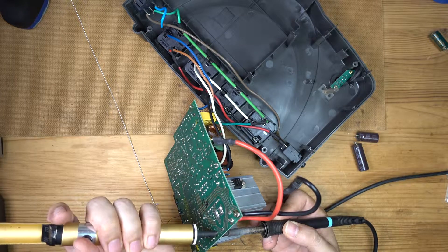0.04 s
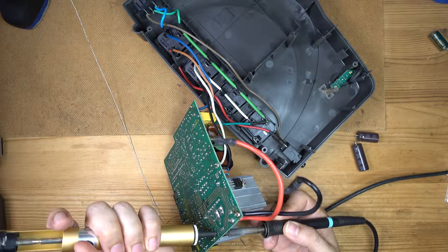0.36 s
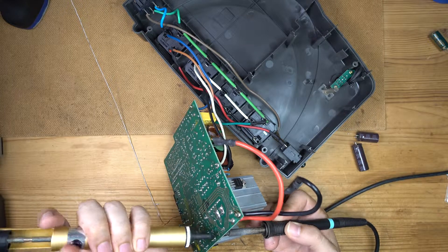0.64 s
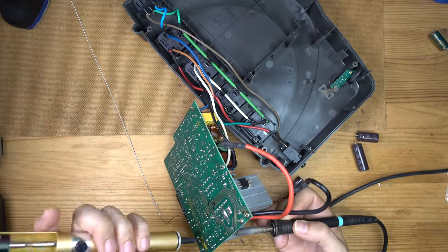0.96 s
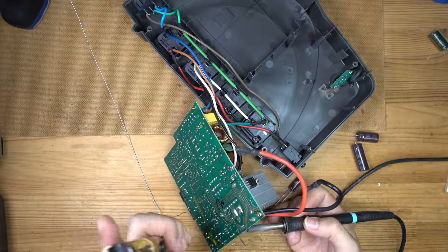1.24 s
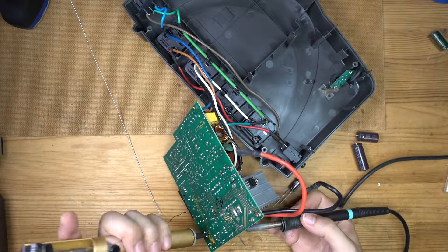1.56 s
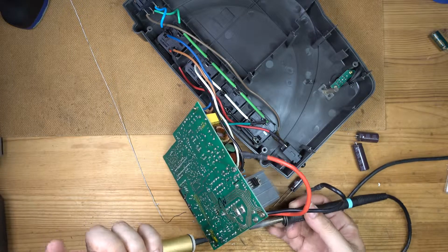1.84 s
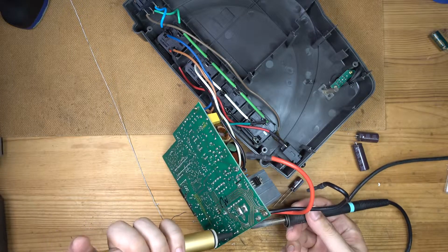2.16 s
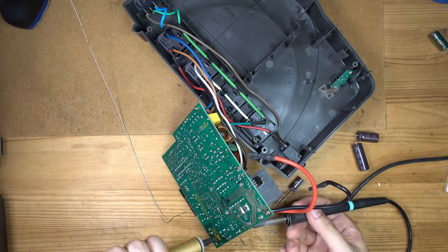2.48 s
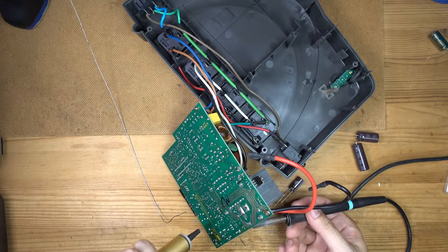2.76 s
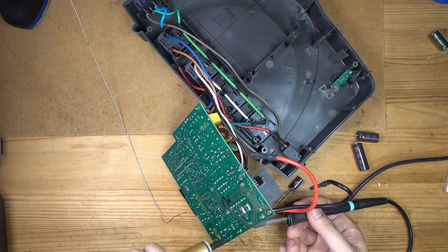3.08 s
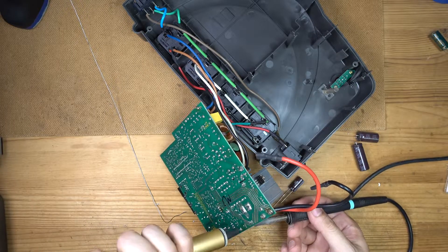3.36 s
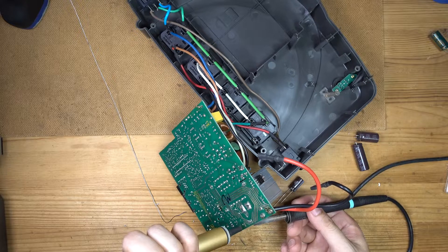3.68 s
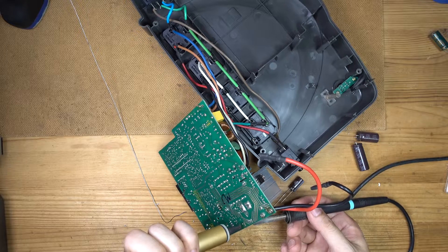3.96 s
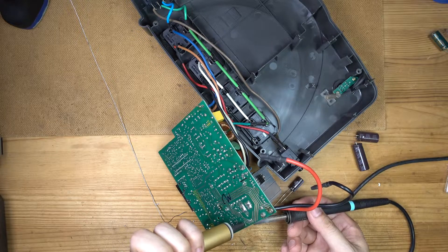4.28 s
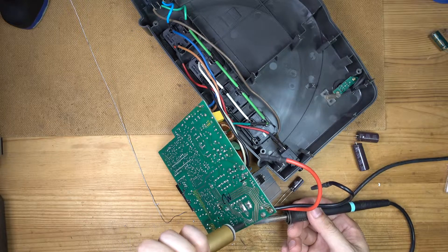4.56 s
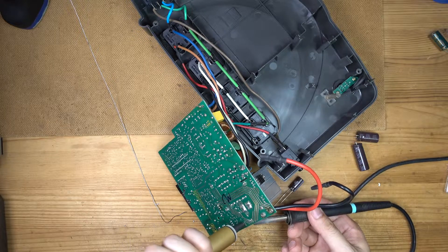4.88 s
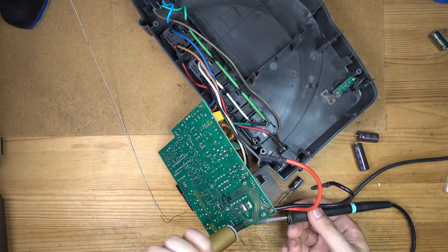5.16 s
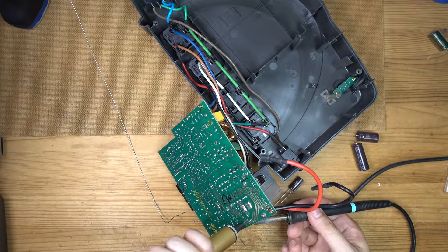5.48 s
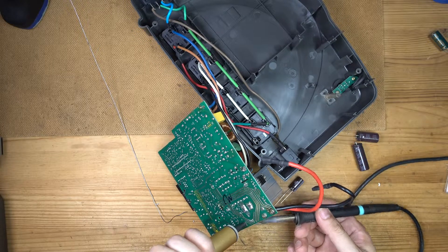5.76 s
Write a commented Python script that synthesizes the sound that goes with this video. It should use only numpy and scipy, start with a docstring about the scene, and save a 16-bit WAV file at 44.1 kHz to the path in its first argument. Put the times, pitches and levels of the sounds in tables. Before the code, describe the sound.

A spring-loaded desoldering pump is handled close to a stereo microphone in a small room with a steady low rumble and faint hiss. At about 0.4 seconds it fires with a short rush of air, ending in a knock and a soft boom from the wooden table. Sharp steel clicks follow around 0.7 seconds. From 1.3 to 2 seconds pump and circuit board knock lightly, with a bright click at 1.5 and brief rubs of the plunger being pushed down. Two ringing clicks come at 2.7 and 2.9 seconds, and the plunger slides again. At 3.1 seconds the spring snaps, by far the loudest sound, leaving a short, high metallic ring in the barrel. Dull knocks and soft table thumps follow between 3.2 and 3.4 seconds. After that there are only faint plastic rubs around 4 seconds and a few tiny taps until about 5.5.

```python
"""A spring-loaded desoldering pump at a circuit board, close to a camera's stereo microphone.
It fires with a short rush of air, is pushed down until it latches, and later snaps loudly,
leaving its barrel ringing. Steel parts click; pump and board knock on a wooden table that booms.
The place is a small room with a low steady rumble. The camera's limiter ducks under the snap."""
import sys
import numpy as np
from scipy import signal
from scipy.fft import rfft, irfft, next_fast_len
from scipy.io import wavfile
from scipy.ndimage import uniform_filter1d, minimum_filter1d, map_coordinates

SR = 44100
rng = np.random.default_rng(int(sys.argv[2]) if len(sys.argv) > 2 else 0)


def waveform_to_disk(signal):
    """Save audio, clipped to [-1, 1], as 16-bit WAV at the path in sys.argv[1]."""
    frames = np.transpose(np.atleast_2d(signal))
    scaled = np.clip(frames, -1, 1) * 32767
    samples = np.round(scaled).astype(np.int16)
    wavfile.write(sys.argv[1], SR, samples)


N = 257103


def amp(db):
    """Decibels to gain."""
    return 10 ** (np.asarray(db) / 20)


def unit(x):
    """Scale to rms 1."""
    return x / np.sqrt(np.mean(x ** 2) + 1e-20)


def along(points, hz):
    """Read (Hz, value) points on a log frequency axis."""
    freqs, values = np.transpose(points)
    return np.interp(np.log(hz + 1), np.log(freqs + 1), values)


def clock(size):
    """Sample times in seconds."""
    return np.arange(size) / SR


def add(track, s, sound):
    """Mix a sound into a track at s seconds."""
    part = track[:, round(s * SR):][:, :sound.shape[-1]]
    part += sound[..., :part.shape[1]]


def peak(hz, centre_hz, width):
    """Shape of one resonance, 1 at its centre; width is relative."""
    return 1 / (1 + ((hz / centre_hz - 1) / width) ** 2)


def gate(start, end, edge_db_per_s):
    """Level in dB: 0 from start to end, falling away steadily on both sides."""
    t = clock(N)
    return -edge_db_per_s * np.abs(t - np.clip(t, start, end))


def coloured(x, gain_db):
    """Minimum-phase filter; gain_db is a function of frequency."""
    size = 2 * next_fast_len(x.shape[-1] // 2 + 1024, True)
    cepstrum = irfft(np.log(amp(gain_db(np.fft.rfftfreq(size, 1 / SR))) + 1e-6))
    cepstrum[1:size // 2] *= 2
    cepstrum[size // 2 + 1:] = 0
    return irfft(rfft(x, size) * np.exp(rfft(cepstrum)))[..., :x.shape[-1]]


# Close sound and room sound at the microphone. Each row: frequency in Hz, left-right coherence.
CLOSE_FIELD = [(300, 1), (700, 1), (1500, 0.61), (4000, 0.38), (12000, .03)]
ROOM_FIELD = [(130, 1), (290, 0.96), (640, 0.84), (1410, 0.35), (3100, 0.1), (7000, -0.1)]
def noise(size, field):
    """White stereo noise, as alike in left and right as the field says."""
    fast = next_fast_len(size, True)
    coherence = along(field, np.fft.rfftfreq(fast, 1 / SR))
    angle = np.arccos(np.clip(coherence, -1, 1)) / 2
    spectra = rfft(rng.standard_normal((2, fast)))
    mid, side = irfft(spectra * [np.cos(angle), np.sin(angle)], fast)[:, :size]
    return np.array([mid + side, mid - side])


def steady_noise(spectrum):
    """Coloured noise from all round the room, rms 1."""
    size = next_fast_len(N, True)
    gain = amp(along(spectrum, np.fft.rfftfreq(size, 1 / SR)))
    return unit(irfft(rfft(noise(size, ROOM_FIELD)) * gain, size)[:, :N])


# The room's rumble and the microphone's hiss. Each row: frequency in Hz, relative level in dB.
RUMBLE_SPECTRUM = [(20, -29), (45, -20), (80, -16.5), (105, -4), (125, -5.5), (173, -10.5), (280, -11),
                   (375, -15.5), (490, -13.5), (570, -18.5), (740, -17), (1100, -24.5), (1600, -34),
                   (3000, -80)]
HISS_SPECTRUM = [(700, -29.5), (1200, -12), (1550, -3.5), (1700, 1), (1950, -6), (2330, -0.5), (2700, -7.5),
                 (3300, -8), (6000, -10), (12000, -10.5), (13100, -9.5), (16000, -12.5)]
def room_tone(hum_hz=50, hum_db=-62, boom_hz=124, boom_db=-60, swell_db=2, rumble_db=-54, hiss_db=-65):
    """Mains hum, a slowly swelling room resonance, low rumble and microphone hiss."""
    t = clock(N)
    hum = amp(hum_db) * np.sqrt(2) * np.sin(2 * np.pi * hum_hz * t)
    swell = amp(swell_db * map_coordinates(rng.standard_normal(size=64), [2 * t]))
    boom = unit(coloured(noise(N, ROOM_FIELD), lambda hz: 20 * np.log10(peak(hz, boom_hz, 0.063))))
    rumble = amp(rumble_db) * steady_noise(RUMBLE_SPECTRUM)
    hiss = amp(hiss_db) * steady_noise(HISS_SPECTRUM)
    return hum + amp(boom_db) * swell * boom + rumble + hiss


def stroke(envelope, tone, flutter_db, room_db=-5, room_t60=0.3):
    """Fluttering noise of a plunger stroke close by, and its echo in the room."""
    flutter = unit(uniform_filter1d(rng.standard_normal(N), size=130))
    hiss = unit(coloured(noise(N, CLOSE_FIELD), tone))
    direct = envelope * amp(flutter_db * flutter) * hiss
    tail = noise(SR // 2, ROOM_FIELD) * amp(-60 * clock(SR // 2) / room_t60)
    echo = signal.fftconvolve(direct, tail / np.linalg.norm(tail[0]), axes=1)[:, :N]
    return direct + amp(room_db) * echo


# Air at the nozzle. Each row: frequency in Hz, relative level in dB.
AIR_SPECTRUM = [(40, -23), (90, -6), (180, 7.5), (400, -4.5), (1000, -3.5), (3000, -3.5), (4900, 1.5),
                (6000, -5.5), (12000, -3), (16000, -6)]
def suction(fire_s=0.434, flight_s=0.031, db=-28.5, hold_s=0.015, sag_db_per_s=1000):
    """Air rushes in while the plunger flies back, weakening as the spring slackens."""
    sag_db = sag_db_per_s * np.maximum(clock(N) - fire_s - hold_s, 0)
    level_db = db - sag_db + gate(fire_s, fire_s + flight_s, edge_db_per_s=7500)
    return stroke(amp(level_db), lambda hz: along(AIR_SPECTRUM, hz), flutter_db=2.5)


# Soft bumps on the wooden table. Each row: start in seconds, level in dB, base t60 in seconds.
TABLE_BUMPS = [(.435, -33, 0.35), (.468, -34.5, 0.63), (1.304, -32.5, 0.22), (1.707, -37.5, 0.21),
               (3.227, -46.5, 1), (3.368, -44.5, 0.34)]
# The table top's modes. Each row: frequency in Hz, relative level in dB, share of the base t60.
TABLE_MODES = [(102.4, -6, 0.72), (121.5, 1.5, 0.98), (149, -6, 0.62), (186, -3, 0.46)]
def thumps(detune=0.036):
    """The table top booms at its low resonances, tuned a little differently at each bump."""
    out, t = np.zeros((2, N)), clock(SR // 2)
    for s, db, t60 in TABLE_BUMPS:
        boom = sum(amp(mode_db - 60 * t / (t60 * share))
                   * np.sin(2 * np.pi * hz * t * rng.normal(1, detune))
                   for hz, mode_db, share in TABLE_MODES)
        add(out, s, amp(db) * boom * (1 - np.exp(-t / 0.004)))
    return out


# The small room's reverberation. Each row: frequency in Hz, t60 in seconds.
ROOM_DECAY = [(150, 0.41), (600, 0.25), (3000, 0.35), (9000, 0.3), (16000, 0.28)]
def contact(tone, attack_s, t60, scatter_db, scatter_t60, room_db):
    """A short crack close by, scatter from the table, then the room; rms 1 over its first 4 ms."""
    t = clock(SR // 2)
    decay = amp(-60 * t / t60) + amp(scatter_db - 60 * t / scatter_t60)
    close = noise(len(t), CLOSE_FIELD) * decay * (1 - np.exp(-t / attack_s))
    hz, frame_s, spectra = signal.stft(noise(len(t), ROOM_FIELD), SR, nperseg=256)
    room_decay = amp(-60 * frame_s / along(ROOM_DECAY, hz)[:, None])
    tail = signal.istft(spectra * room_decay, SR)[1][:, :len(t)]
    hit = coloured(close + amp(room_db) * tail * (1 - np.exp(-t / 0.0045)), tone)
    return hit / np.sqrt(np.mean(hit[:, :SR // 250] ** 2))


# Dull knocks of plunger stop, board and case.
# Each row: start in seconds, level in dB, body gain in dB, treble gain in dB.
KNOCK_HITS = [(0.466, -24.5, 8.5, 4.5), (0.4806, -37.5, -4, -2), (1.1287, -53, 1, -5), (1.2775, -46, 0, -1),
              (1.2977, -50, 4, 4), (1.3347, -48, -6, -5), (1.577, -39.5, -1.5, 1), (1.6955, -50, 1, 5),
              (1.9817, -46, 3, -2), (3.2258, -31.5, 3, 8.5), (3.3341, -41.5, -6.5, -3),
              (3.3704, -32, 1, 5.5), (3.3776, -41.5, 10, 1), (3.476, -53.5, 4, 2), (3.8492, -52, 10, -4),
              (4.4977, -59, 3, -2), (5.4804, -57.5, 3, -1)]
# The tone they share. Each row: frequency in Hz, relative level in dB.
KNOCK_SPECTRUM = [(40, -31), (90, -16), (180, 1), (400, 1), (1000, 2), (2000, 1.5), (4500, -2.5),
                  (6500, -7.5), (12000, -14), (16000, -15.5)]
def knocks(clack_hz=1815, clack_spread=0.045):
    """Plastic and board knock with a few short resonances; the main one shifts with the spot struck."""
    out = np.zeros((2, N))
    for s, db, body_db, treble_db in KNOCK_HITS:
        ring_hz = clack_hz * np.exp(clack_spread * rng.standard_normal())
        shade = [(800, body_db), (2200, 0), (4000, 0), (8000, treble_db)]
        hollow = lambda hz: (6 * peak(hz, ring_hz, 0.05) + 5 * peak(hz, 4790, 0.035)
                             + 4 * peak(hz, 3580, 0.026) - 8 * peak(hz, 1305, 0.052))
        tone = lambda hz: along(KNOCK_SPECTRUM, hz) + along(shade, hz) + hollow(hz)
        knock = contact(tone, attack_s=0.0015, t60=0.029, scatter_db=-7, scatter_t60=0.061, room_db=-13.5)
        add(out, s, amp(db) * knock)
    return out


# Modes of the steel catch and plunger. Each row: frequency in Hz, relative width, boost in dB.
STEEL_MODES = [(3050, .035, 6.5), (4160, 0.0202, 5), (5540, 0.019, 8), (6360, 0.021, 12.5), (6870, .02, 2),
               (8130, 0.018, 6.5), (11260, 0.1, 9.5)]
def steel(hz):
    """The boost in dB that the steel's resonances give each frequency."""
    return sum(db * peak(hz, centre_hz, width) for centre_hz, width, db in STEEL_MODES)


# Sharp clicks of catch and plunger. Each row: start in seconds, level in dB, middle gain in dB,
# treble gain in dB, favoured frequency in Hz, strength of the steel's ring from 0 to 1.
CLICK_HITS = [(0.6581, -35.5, -1, -9, 2400, 0.5), (0.6693, -33.5, -7, 3, 4180, 0.5),
              (0.7631, -24.5, -6.5, 6, 4840, 0.1), (1.496, -26, -3.5, 3, 3600, 0.86),
              (2.28, -54.5, -20, -7.5, 3370, 0.7), (2.704, -38, 0.5, 2, 3170, 1),
              (2.9018, -42.5, 3.5, -7, 3080, 0.8)]
# The tone they share. Each row: frequency in Hz, relative level in dB.
CLICK_SPECTRUM = [(40, -21), (200, -5), (1250, -14), (2000, -6), (2400, -5.5), (3300, -3), (5000, -1.5),
                  (7800, -1), (9000, -7.5), (12500, -3.5), (16000, -9)]
def clicks(full_ring_db=-23, ring_t60=0.26, ring_focus=2.2):
    """Metal strikes metal, each time with its own brightness, and the steel rings on."""
    out, t = np.zeros((2, N)), clock(SR // 2)
    for s, db, middle_db, treble_db, favoured_hz, ringing in CLICK_HITS:
        shade = [(200, middle_db - 6), (1700, middle_db - 1.5), (2600, middle_db),
                 (5000, 0), (10000, treble_db)]
        resonances = lambda hz: ringing * steel(hz) + 7.7 * peak(hz, favoured_hz, 0.061)
        tone = lambda hz: along(CLICK_SPECTRUM, hz) + along(shade, hz) + resonances(hz)
        hit = contact(tone, attack_s=0.00049, t60=0.014, scatter_db=-4, scatter_t60=0.057, room_db=-13.5)
        ring = unit(coloured(noise(len(t), CLOSE_FIELD), lambda hz: ring_focus * steel(hz)))
        ring *= ringing * amp(full_ring_db - 60 * t / ring_t60)
        add(out, s, amp(db) * (hit + ring))
    return out


# Light rubs of plastic. Each row: loudest moment in seconds, level in dB, frequency in Hz,
# fade time to either side in seconds, relative width of the resonance.
PLASTIC_RUBS = [(1.378, -49.5, 2150, 0.0043, 0.14), (1.48, -52.5, 1550, .02, 1.8),
                (3.66, -71, 4700, .24, .35), (4.047, -55, 950, 0.051, 0.89)]
def squeaks(resonance_db=50):
    """Plastic sticks and slips: noise in one resonance swells and fades."""
    out, t = np.zeros((2, N)), clock(SR // 2)
    middle = t.mean()
    for s, db, centre_hz, fade_s, width in PLASTIC_RUBS:
        rub = coloured(noise(len(t), CLOSE_FIELD), lambda hz: resonance_db * peak(hz, centre_hz, width))
        envelope = np.exp(-2 * ((t - middle) / fade_s) ** 2)
        add(out, s - middle, amp(db) * envelope * unit(rub))
    return out


# Pushes on the plunger. Each row: start in seconds, end in seconds, final level in dB.
PLUNGER_PUSHES = [(1.48, 1.568, -50), (1.64, 1.695, -57.5), (2.91, 3.078, -50), (3.208, 3.223, -48)]
# Friction in the barrel. Each row: frequency in Hz, relative level in dB.
SLIDE_SPECTRUM = [(60, -32), (500, 0.5), (1800, -3.5), (4000, -1.5), (7000, -6.5), (9000, -10),
                  (12000, -8.5), (16000, -12.5)]
def slide(swell_db=11.5):
    """The plunger rubs along the barrel, louder through each push as the spring tightens."""
    t, envelope = clock(N), np.zeros(N)
    for start, end, db in PLUNGER_PUSHES:
        level_db = db + np.interp(t, [start, end], [-swell_db, 0])
        envelope += amp(level_db + gate(start, end, edge_db_per_s=900))
    return stroke(envelope, lambda hz: along(SLIDE_SPECTRUM, hz) + 0.58 * steel(hz), flutter_db=1.7)


# The spring's crack. Each row: frequency in Hz, relative level in dB.
SNAP_SPECTRUM = [(60, -47), (300, -31), (700, -30), (920, -14.5), (1350, -19.5), (1720, -2), (2080, -15.5),
                 (2330, -1), (2880, 0), (3200, -7.5), (5000, -8), (8000, -10.5), (12000, -14), (16000, -28)]
# The barrel's modes. Each row: frequency in Hz, relative level in dB, t60 in seconds.
BARREL_MODES = [(1682, -18, .25), (2300, -20, .2), (2590, -22, .2), (2660, -12, .2), (2760, -13, 0.21),
                (2973, -19, .2), (3397, -23, .2), (4090, -14.5, 0.24), (4960, -16, .2), (5465, -20, .2),
                (6440, 5.5, 0.19), (6810, -13, 0.25), (8200, -19, .2), (9507, -26, 0.195), (10760, -35, .2)]
def snap(s=3.0825, db=-14, ring_db=-11.5, slip_s=3.0687, slip_db=-41):
    """The catch slips with a tick, the spring snaps home with a crack, and the barrel rings on."""
    out, t = np.zeros((2, N)), clock(SR // 2)
    tone = lambda hz: along(SNAP_SPECTRUM, hz)
    tick = contact(tone, attack_s=0.00059, t60=0.032, scatter_db=-7, scatter_t60=0.0934, room_db=-7)
    crack = contact(tone, attack_s=0.0003, t60=0.03, scatter_db=-3, scatter_t60=0.094, room_db=-9.5)
    ring = np.zeros((2, len(t)))
    for hz, mode_db, t60 in BARREL_MODES:
        phase = rng.random() + 0.3 * rng.random((2, 1))  # in cycles, a little apart left and right
        ring += amp(mode_db - 60 * t / t60) * np.sin(2 * np.pi * (hz * t + phase))
    ring *= amp(ring_db) * (1 - np.exp(-t / 0.0059))
    add(out, slip_s, amp(slip_db) * tick)
    add(out, s, amp(db) * (crack + ring))
    return out


def scene():
    """Pump and board on the table close to the microphone, the room behind them."""
    return room_tone() + suction() + thumps() + knocks() + clicks() + squeaks() + slide() + snap()


def record(dry, ceiling_db=-10.5, release_db_per_s=230, top_hz=16000):
    """The camera: a fast limiter that recovers steadily, then a band limit."""
    recovery_db = release_db_per_s * clock(N)
    level_db = 20 * np.log10(np.abs(dry).max(axis=0) + 1e-9)
    excess_db = np.maximum(level_db - ceiling_db, 0)
    duck_db = np.maximum.accumulate(excess_db + recovery_db) - recovery_db
    gain = uniform_filter1d(minimum_filter1d(amp(-duck_db), size=45), size=45)  # eased over 1 ms
    size = next_fast_len(N + SR // 10)
    passband = np.fft.rfftfreq(size, 1 / SR) < top_hz
    return irfft(rfft(dry * gain, size) * passband, size)[:, :N]


dry = scene()
out = record(dry)
waveform_to_disk(out)
```